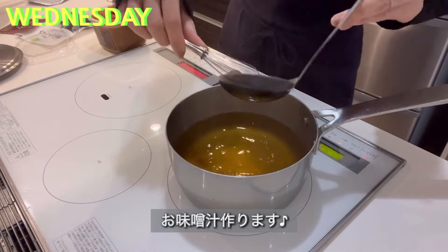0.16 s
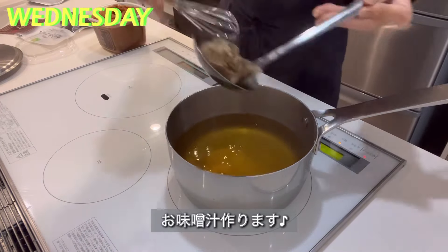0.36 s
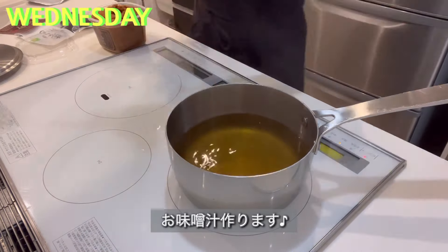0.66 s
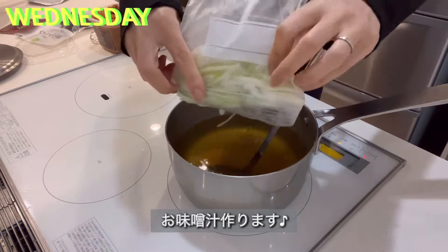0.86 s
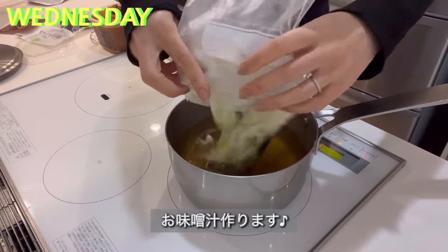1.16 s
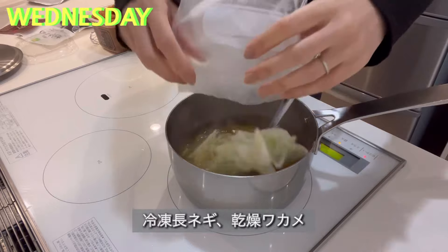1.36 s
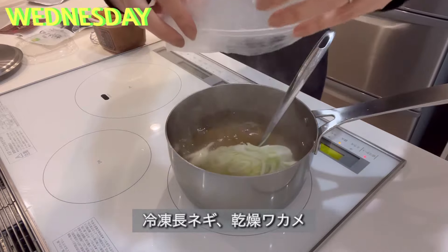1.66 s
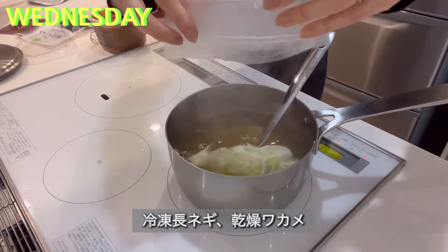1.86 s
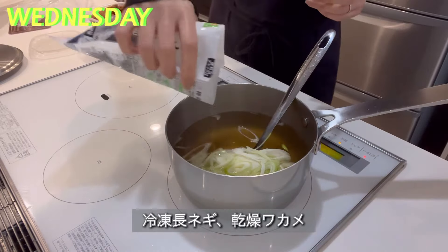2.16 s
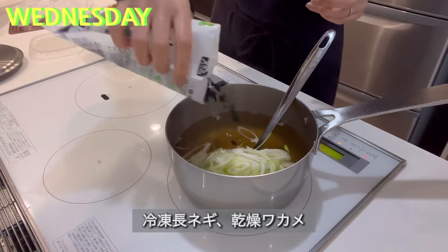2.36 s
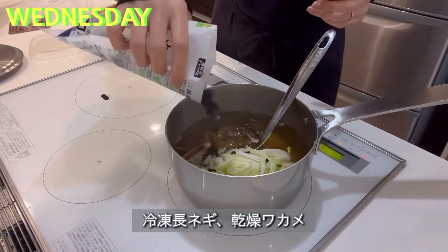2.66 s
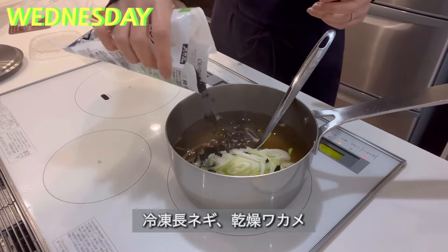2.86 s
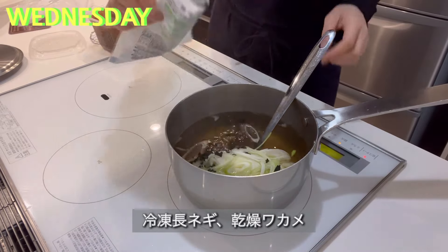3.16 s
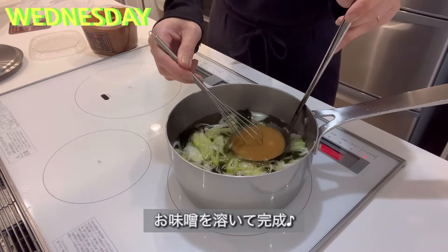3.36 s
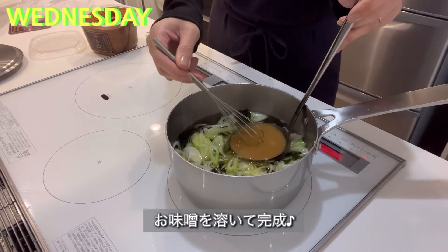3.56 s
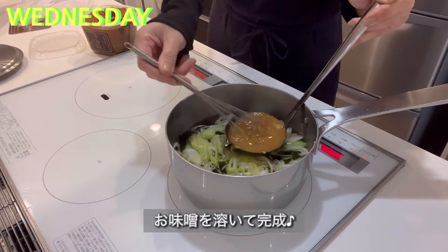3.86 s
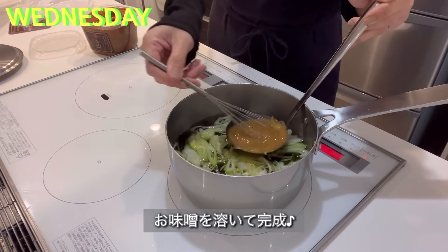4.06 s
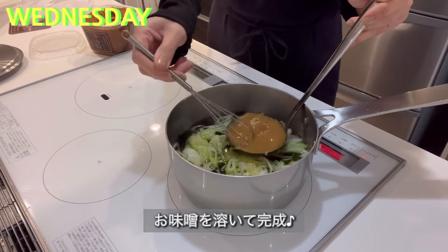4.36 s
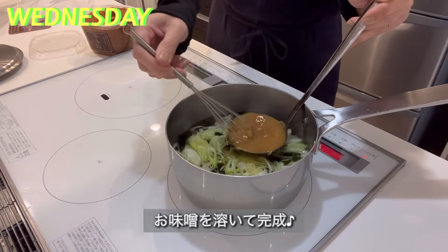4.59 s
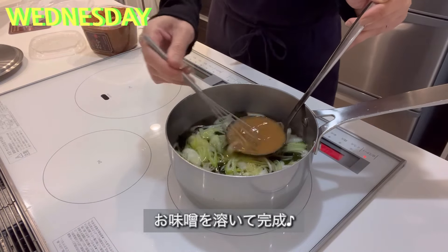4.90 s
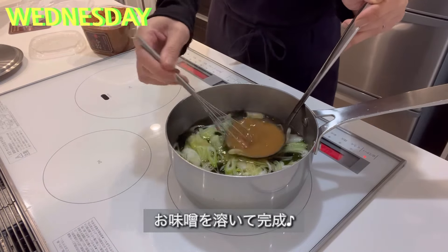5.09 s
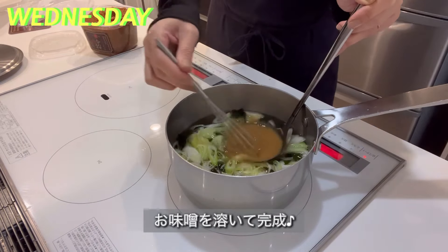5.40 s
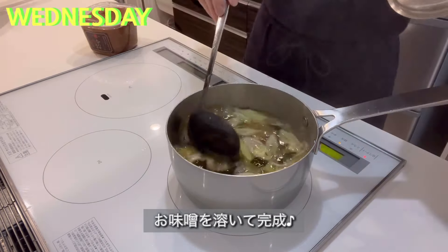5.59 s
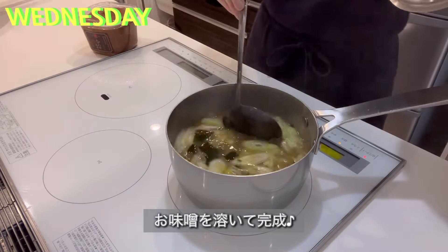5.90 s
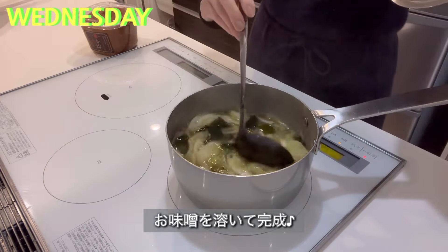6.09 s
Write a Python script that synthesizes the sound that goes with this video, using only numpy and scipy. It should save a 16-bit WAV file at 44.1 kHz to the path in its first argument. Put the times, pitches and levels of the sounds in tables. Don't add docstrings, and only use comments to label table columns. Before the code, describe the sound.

A small, hard-surfaced kitchen with a low, rushing hood fan throughout, picked up in stereo by a phone nearby. From 0.1 s whisk wires tick thinly on a steel ladle, scrape along it from 0.17 to 0.35 s, and tick once more. At 0.7 s the scene cuts to a freezer bag crackling loudly, with a strong squeeze at 1.0 s. At about 1.19 s a frozen block drops and the ladle clatters against the pot, several fast bright bounces with a low thud, the loudest moment, gone by 1.4 s. The film settles in tiny pops. From 1.9 s a stiff foil pack rustles and snaps, strongest near 2.26 and 2.43 s, calming by 2.9 s, with a brief rustle before 3.2 s. Then the fan is a little louder and broth simmers in a soft bubbling hiss, with small steel touches and drips around 4.6 to 5.3 s. After 5.47 s it drops to quieter fan and faint stirring ticks.

```python
import sys
import numpy as np
from scipy import signal
from scipy.fft import rfft, irfft
from scipy.io import wavfile
from scipy.ndimage import uniform_filter1d, map_coordinates

SR = 44100
rng = np.random.default_rng(int(sys.argv[2]) if len(sys.argv) > 2 else 0)


def wav_out(sig):
    wavfile.write(sys.argv[1], SR, np.round(np.clip(np.atleast_2d(sig).T, -1, 1) * 32767).astype(np.int16))


def gain_from_decibels(decibels):
    exponent = np.asarray(decibels, float) / 20
    return 10 ** exponent


N = 275184
TIME = np.arange(N) / SR


def level(x, db):
    return x * gain_from_decibels(db) / np.sqrt(np.mean(x ** 2))


def at_hz(table, hz, axis=1):
    points = np.array(table)
    return np.interp(np.log(hz + 1), np.log(points[:, 0]), points[:, axis])


def colour(x, table, size=4096):
    gain = gain_from_decibels(at_hz(table, np.arange(size // 2 + 1) * SR / size))
    cepstrum = irfft(np.log(gain))
    cepstrum[1:size // 2] *= 2
    cepstrum[size // 2 + 1:] = 0
    response = irfft(np.exp(rfft(cepstrum)))
    return signal.fftconvolve(x, response)[:len(x)]


def band(x, lo_hz, hi_hz, order=2):
    return signal.sosfilt(signal.butter(order, [lo_hz, hi_hz], "band", fs=SR, output="sos"), x)


def thirds(x):
    body = level(band(x, 280, 1600), 0)
    crackle = level(band(x, 1800, 6500), 0)
    treble = level(band(x, 7500, 18000), 0)
    return body, -crackle, treble


def walk(rate, size=N):
    hold = int(SR / rate)
    steps = np.repeat(rng.standard_normal(size // hold + 1), hold)
    return 1.02 * uniform_filter1d(uniform_filter1d(steps, hold), hold)[:size]


def ring(modes, size, spread_db, rattle=0.):
    hz, db, t60 = np.transpose(modes)[:, :, None]
    loudness, detune, sign = rng.standard_normal((3, len(modes), 1))
    t = TIME[:size]
    flutter = np.repeat(rng.standard_normal((len(modes), size // 200)), 200, axis=1)
    flutter = uniform_filter1d(flutter, size=200, axis=1)
    push = np.sign(sign) * (1 + rattle * flutter) / np.hypot(1, rattle)
    fade = np.exp(-np.log(1000) * t / np.minimum(t60, .5))
    tone = np.sin(2 * np.pi * hz * (1 + 0.00216 * detune) * t)
    return push * gain_from_decibels(db + spread_db * loudness) * fade * tone


def burst(t60, size=4000):
    return rng.standard_normal(size) * np.exp(-np.log(1000) * TIME[:size] / t60)


def add(out, s, sound):
    i = int(s * SR)
    out[..., i:i + sound.shape[-1]] += sound[..., :N - i]


def steady(table, flicker_db):
    out = 0
    spectrum = rfft([colour(noise, table) for noise in rng.standard_normal((2, N))])
    octave = np.log2(np.arange(N // 2 + 1) * SR / N + 1)
    for centre in range(4, 16, 2):
        window = np.cos(np.pi / 4 * np.clip(octave - centre, -2, 2)) ** 2
        out = out + gain_from_decibels(flicker_db * walk(9)) * irfft(spectrum * window, N)
    return level(out, 0)


# pitch_hz [Hz], level_db [dB per Hz]
FAN_AIR = [(25, -22), (92, 2), (150, -6), (250, -9), (300, -9.5), (440, -17.5), (550, -17.5), (700, -13),
           (800, -29.5), (1300, -32.5), (2300, -49), (5500, -52), (11000, -49), (15800, -57.5)]
# pitch_hz [Hz], width_hz [Hz], level_db [dB]
HOOD_DUCT = [(87.5, 13, 1.5), (118.1, 32, 3), (200, 20, -4), (425.5, 23, 3), (464.6, 22, -3.5),
             (650.6, 16, -10), (986, 60, -11), (1560, 72, -24)]


def fan():
    push = rng.standard_normal((2, N))
    duct = sum(level(band(push, hz - width / 2, hz + width / 2), db) for hz, width, db in HOOD_DUCT)
    return steady(FAN_AIR, flicker_db=1.54) + level(duct, -4.5)


# pitch_hz [Hz], level_db [dB per Hz]
BROTH = [(200, -9), (400, 1), (700, -12.5), (800, -11), (950, -12.5), (1250, -22), (1600, -18), (2100, -30),
         (3000, -31), (4500, -32), (5400, -26.5), (6500, -32), (8000, -26.5), (9500, -30.5), (11400, -31.5),
         (12500, -36), (15800, -49)]


def simmer():
    return steady(BROTH, flicker_db=1.44)


def narrow_bursts(table, t60):
    out = np.zeros(N)
    for s, db, hz in table:
        sound = band(burst(t60), hz / 1.2, hz * 1.2)
        add(out, s, gain_from_decibels(db - 3.0) * sound / np.abs(sound).max())
    return out


# start_s [s], peak_db [dB], pitch_hz [Hz]
BROTH_DRIPS = [(4.58, -51, 4500), (4.665, -45, 4500), (4.8711, -43, 11000), (4.8891, -33.5, 2230),
               (4.905, -49, 2400), (4.94, -48, 2300), (5.2987, -50, 4290), (5.6, -56, 4200),
               (5.6194, -52, 3100), (5.6194, -54, 11500), (5.645, -61, 3500), (5.66, -64.5, 11500),
               (5.69, -58, 2400), (5.71, -62, 10500), (5.8434, -65, 10990), (5.8863, -60.5, 10950),
               (5.955, -60, 11540), (6.0, -56, 11200), (6.0584, -59.5, 10500), (6.075, -62.5, 5020),
               (6.168, -60, 1400), (6.1931, -61, 10900), (6.2091, -59, 11200)]


def drips():
    return narrow_bursts(BROTH_DRIPS, t60=0.06)


# start_s [s], pitch_hz [Hz], level_db [dB], t60_s [s to fade by 60 dB]
DULL_KNOCKS = [(0.69, 90, -32.5, 0.13), (.892, 298, -33, .025), (1.012, 200, -34.5, 0.1),
               (1.035, 259, -36, 0.078), (1.064, 268, -33.5, 0.14), (1.098, 121, -36.5, .11),
               (1.124, 261, -38.5, .085), (1.128, 106, -37, 0.12), (1.14, 155, -33, 0.12),
               (1.7, 275, -44.5, 0.061), (1.198, 134, -18, 0.068), (1.212, 200, -24.5, 0.13),
               (1.224, 469, -24.5, 0.045), (1.245, 455, -25, 0.068), (1.317, 129, -34, .07),
               (1, 120, -35, 0.099), (1.391, 124, -36.5, 0.22), (1.451, 200, -41, .07),
               (2.093, 420, -33.5, 0.047), (2.096, 279, -35.5, .06), (2.258, 273, -32.5, 0.071),
               (2.43, 268.3, -38.5, 0.14), (2.7, 320, -49, 0.054), (5, 1590, -50.5, .043),
               (6.168, 1398, -68.5, 0.025)]


def knocks():
    out = np.zeros(N)
    for s, hz, db, t60 in DULL_KNOCKS:
        cluster = [(hz, db + 7.5, t60), (0.98 * hz, db, t60 / 2), (0.95 * hz, db, t60 / 2)]
        add(out, s, ring(cluster, size=8000, spread_db=1.0, rattle=0.36).sum(axis=0))
    return out


# start_s [s], pitch_hz [Hz], level_db [dB], t60_s [s to fade by 60 dB]
STEEL_PINGS = [(.1592, 9700, -43, 0.024), (.3662, 13100, -37, .025), (0.366, 11000, -41, .02),
               (0.3668, 9900, -37, .02), (1.1893, 7730, -19.5, .05), (1.2076, 11050, -13, 0.029),
               (1.209, 7800, -19, .04), (1.212, 6150, -21, .15), (1.214, 1018, -23.5, 0.15),
               (1.222, 9200, -27, 0.033), (1.224, 5750, -20, .08), (1.226, 5820, -25, .15),
               (1.232, 7780, -20, .04), (1.236, 4000, -22, .17), (1.239, 4540, -28, .17),
               (1.24, 4140, -34, .17), (1.4, 7780, -32, .04), (1.252, 11200, -32, .04),
               (4.6231, 3930, -46.5, 0.029), (4.6237, 12600, -46, .015), (4.6239, 10400, -51, .015),
               (4.794, 10000, -53, .02), (4.889, 1700, -41, 0.013), (4.8906, 2290, -50, .012),
               (5.0718, 8600, -35, 0.018), (5.073, 9500, -35, 0.017), (5.0722, 6300, -49, 0.016),
               (5.079, 11600, -47, .015), (5.6196, 4400, -51, 0.013), (5.62, 3300, -51, 0.0097),
               (5.6186, 2500, -50, .012)]


def pings():
    out = np.zeros(N)
    for s, hz, db, t60 in STEEL_PINGS:
        tones = [(hz, db, t60), (0.67 * hz, db - 4, t60 / 2)]
        add(out, s, ring(tones, size=6000, spread_db=-1.0, rattle=.2).sum(axis=0))
    return out


# pitch_hz [Hz], level_db [dB per Hz]
FILM_COLOUR = [(150, -7.5), (350, 2), (1000, 1), (2400, -3.5), (4500, -4), (6800, -5), (8000, -7.5),
               (9300, -4.5), (12500, -9), (13500, -12.5), (14100, -14), (15800, -25)]


def lone_cracks(table, t60):
    out = np.zeros(N)
    for s, db, treble_db, body_db in table:
        body, crackle, treble = thirds(colour(burst(t60), FILM_COLOUR))
        sound = crackle + gain_from_decibels(treble_db) * treble + gain_from_decibels(body_db) * body
        add(out, s, gain_from_decibels(db + 1.5) * sound / np.abs(crackle).max())
    return out


# start_s [s], peak_db [dB], treble_db [dB], body_db [dB]
STIR_TOUCHES = [(3.676, -54, 11, 16), (4.347, -60, -7, 12), (4.412, -66, -7, 19), (4.6229, -50.5, 14, -3),
                (4.7937, -48.5, 7, -10), (4.8896, -43, 3, 8), (5.024, -59, 19.5, 0),
                (5.0711, -55.5, 22.5, -7), (5.273, -48, 11, -5), (5.2984, -54.5, 11, -3),
                (5.5816, -65, 2, 0), (5.6194, -51.5, -7, -5), (6.0304, -72.5, 15, 0)]


def stirs():
    return lone_cracks(STIR_TOUCHES, t60=0.018)


# start_s [s], length_s [s], pitch_hz [Hz], level_db [dB]
SINGING_WIRES = [(.17, 0.084, 4240, -67), (.18, 0.088, 2900, -74), (.21, 0.046, 12050, -55),
                 (.22, .08, 14150, -53), (.229, .05, 6700, -57), (.231, 0.071, 5930, -57.5),
                 (0.234, 0.038, 10550, -51), (.25, 0.094, 7400, -54), (0.253, .09, 9650, -52),
                 (.26, .09, 4930, -70), (0.268, 0.058, 10300, -53), (0.286, .055, 8750, -55),
                 (.298, .04, 8700, -53), (.302, .04, 11400, -62), (0.369, 0.045, 12000, -61)]


def singing():
    out = np.zeros(N)
    for s, length, hz, db in SINGING_WIRES:
        size = int(length * SR)
        tone = level(band(rng.standard_normal(size), hz - 170, hz + 170), db)
        add(out, s, tone * np.hanning(size))
    return out


# [dB, share of the bowl's low ring]
WHISK_TICKS = [
    (0.1053, -40, 6),
    (.1155, -45, 5),
    (.159, -34.5, -11),
    (.2206, -51.5, -6),
    (.239, -44, -1),
    (.247, -50, -8),
    (.2794, -55, -8),
    (0.367, -38.5, 1.5),
]
# pitch_hz [Hz], level_db [dB], t60_s [s to fade by 60 dB]
WHISK_TONES = [(3566, -9, 0.08), (6450, -4, 0.05), (4100, -20, 0.073), (5890, -10, 0.072),
               (6840, -12, 0.075), (7400, -4.5, 0.071), (7840, -4, 0.076), (8500, -7, 0.11),
               (8900, -10, 0.085), (9900, -8, 0.059), (9900, -6.5, 0.059), (10400, -12, 0.061),
               (10500, -3.5, 0.049), (10800, -2, 0.064), (11220, -7, 0.041), (11770, -16, 0.089),
               (12100, -11, 0.05), (12900, -13, .1), (13160, -12, .1), (13900, -7, 0.1), (14260, -6, .1)]
# start_s [s], level_db [dB]
WHISK_SCRAPE = [
    (.17, -63),
    (.21, -51),
    (.24, -50.5),
    (.28, -52),
    (.31, -53),
    (.335, -56),
    (.347, -62),
    (.355, -75),
]


def whisk():
    out = np.zeros(N)
    bowl, wires = WHISK_TONES[:2], WHISK_TONES[2:]
    for s, db, bowl_db in WHISK_TICKS:
        add(out, s, gain_from_decibels(db - 6.0) * ring(wires, size=5000, spread_db=2.5, rattle=2.0).sum(axis=0))
        add(out, s, gain_from_decibels(db - 6.5 + bowl_db) * ring(bowl, size=5000, spread_db=3.5, rattle=0.33).sum(axis=0))
        click = gain_from_decibels(db - 3.0) * band(burst(0.023), 7100, 16000)
        add(out, s, click + gain_from_decibels(db - 16.0) * band(burst(0.1), 1800, 14500))

    s, db = np.transpose(WHISK_SCRAPE)
    dragging = (TIME > s[0]) * (TIME < s[-1])
    slips = rng.standard_normal(N) * gain_from_decibels(np.interp(TIME, s, db) + 2 * walk(60)) * dragging
    dragged = WHISK_TONES[1:]
    tones = ring(dragged, size=4000, spread_db=-3.0, rattle=1.8)
    tones = tones / np.linalg.norm(tones)
    half = SR // 2
    catch = gain_from_decibels(5.4 * np.array([walk(24.7, size=half) for _ in dragged]))
    add(out, 0, gain_from_decibels(-6.5) * signal.fftconvolve(slips[:half] * catch, tones, axes=1).sum(axis=0))

    out += gain_from_decibels(-5.5) * band(slips, 5300, 15000)
    out += gain_from_decibels(-7.0) * band(slips, 10200, 10900)
    return out + gain_from_decibels(-7.0) * band(slips, 1600, 5500)


# start_s [s], peak_db [dB], pitch_hz [Hz]
FILM_SNAPS = [(.7255, -22, 6040), (.8025, -30, 11000), (.812, -22, 3340), (.844, -27, 10500),
              (.882, -27, 10500), (.9636, -27, 1290), (.9847, -13.5, 10200), (.995, -9, 10200),
              (.9932, -15, 3690), (1.027, -12, 10500), (1.032, -27, 11000), (1.1653, -21, 5500),
              (1.4244, -26, 5240), (1.446, -50, 3640), (1.4634, -42, 2450), (1.4882, -36, 3650),
              (1.5192, -47, 2790), (1.54, -43, 2970), (1.547, -46, 4500), (1.6244, -53, 5900),
              (1.642, -59, 2250), (1.6523, -52, 2850), (1.6783, -52, 3990), (1.679, -56.5, 1290),
              (1.6967, -65, 3500), (1.7801, -57, 3600), (1.815, -56, 3500), (1.839, -57, 1400),
              (1.8544, -51, 3500), (1.865, -56, 3520), (2.0575, -24, 2600), (2.2421, -22, 2540),
              (2.263, -14, 3450), (2.4052, -31, 3130), (2.438, -25, 2980), (2.498, -42, 2820),
              (2.808, -33, 11300), (2.825, -44, 10800), (2.85, -45, 11100), (3.0707, -30.5, 2680)]


def snaps():
    return narrow_bursts(FILM_SNAPS, t60=0.031)


# start_s [s], peak_db [dB], treble_db [dB], body_db [dB]
FILM_CREASES = [(0.7248, -26.5, -7, -15), (0.7707, -20.5, 2, -2.5), (0.7906, -28.5, 14.5, -3),
                (0.8026, -22.5, -13.5, 1.5), (0.8624, -26.5, 5, -20), (0.8913, -17, 9.5, 5.5),
                (0.9526, -31, 16, -21), (0.9574, -23, 4.5, -10), (1.3576, -38, 8.5, -25),
                (1.4227, -34.5, 17.5, 6), (1.4561, -35.5, -12, 7.5), (1.6533, -53, -18, 6),
                (1.6786, -56, -14.5, -1), (1.8538, -51.5, -5, -14.5), (2.0943, -31.5, -21, 11),
                (2.2588, -17.5, -28.5, -11), (2.2676, -25.5, -15, -5), (2.4293, -21.5, -24, 0.5),
                (2.4277, -26.5, -17, -23), (2.5691, -31, 13, -22), (2.8, -47.5, 16, -12),
                (2.8614, -47, 9.5, -13), (2.9156, -53.5, 12.5, 1), (3.07, -46, -19, -22)]


def creases():
    return lone_cracks(FILM_CREASES, t60=0.021)


# start_s [s], level_db [dB]
BAG_GRIP = [
    (0.707, -38.5),
    (0.8, -43),
    (0.93, -41.5),
    (1.117, -40.5),
    (1.186, -36.5),
    (1.27, -40),
    (1.344, -46.5),
    (1.48, -53),
    (1.6, -67),
    (1.9, -73.5),
]
# start_s [s], level_db [dB]
FOIL_GRIP = [
    (1.907, -31),
    (2.149, -36.5),
    (2.21, -35.5),
    (2.4, -38),
    (2.72, -38),
    (2.939, -70.5),
    (3.065, -48),
    (3.15, -45.5),
    (3.207, -31),
]
# peak_s [s], level_db [dB], length_s [s]
HAND_SQUEEZES = [(0.859, -36.5, 0.051), (0.955, -38.5, 0.023), (1.004, -20.5, 0.091), (1.162, -32, 0.021),
                 (1.437, -43, 0.03), (1.865, -62.5, 0.035), (2.077, -45.5, 0.0183), (2.261, -31.5, 0.026),
                 (2.341, -35.5, 0.057), (2.431, -27.5, 0.044), (2.508, -33.5, 0.048), (2.605, -38, 0.041),
                 (3.128, -47, .07), (3.206, -47, 0.01)]


def bags():
    sizes = gain_from_decibels(2.0 * np.minimum(rng.exponential(size=N), 4))
    tiny_creases = (rng.random(N) < .15) * rng.standard_normal(N) * sizes
    body, crackle, treble = thirds(colour(tiny_creases * gain_from_decibels(2.5 * walk(39.8)), FILM_COLOUR))

    def film(treble_db, body_db):
        return gain_from_decibels(-5.0) * (crackle + gain_from_decibels(treble_db) * treble + gain_from_decibels(body_db) * body)

    out = np.zeros(N)
    for grip, rustle in ((BAG_GRIP, film(-1.5, -1.8)), (FOIL_GRIP, film(-2, -6.5))):
        s, db = np.transpose(grip)
        in_hand = (TIME >= s[0]) * (TIME < s[-1])
        out += in_hand * gain_from_decibels(np.interp(TIME, s, db)) * rustle

    rise_db, fall_db = 44.5, 25
    swell = np.zeros(N)
    for s, db, length in HAND_SQUEEZES:
        swell += gain_from_decibels(db - np.maximum(rise_db * (s - TIME), fall_db * (TIME - s)) / length)
    rasp = band(crackle, 2400, 3520) * (TIME > FOIL_GRIP[0][0])
    return out + swell * (film(-3, -5.5) + rasp)


# start_s [s], ring_db [dB], crack_db [dB], thud_db [dB]
BOUNCES = [(1.189, -23.5, -20.5, -38.5), (1.193, -26.5, -24.5, -41), (1.198, -37, -41.5, -22.5),
           (1.2075, -13, -15.5, -23.5), (1.213, -20.5, -19.5, -31.5), (1.221, -19.5, -25.5, -20),
           (1.226, -27, -23, -29), (1.233, -24, -24.5, -26.5), (1.241, -33, -28, -34.5),
           (1.2464, -31, -29, -32), (1.251, -25.5, -33, -35), (1.265, -38, -37, -28.5),
           (1.29, -34.5, -38, -37.5)]
# pitch_hz [Hz], level_db [dB], t60_s [s to fade by 60 dB]
POT_TONES = [(975, -5.5, 0.08), (998, -5, .11), (1555, -6.5, 0.098), (2660, -6, 0.15), (3300, -9.5, 0.1),
             (3700, -12.5, .08), (3940, -7, 0.11), (4170, -8, 0.1), (4450, -2.5, 0.13), (5440, -5, .07),
             (6300, -6.5, 0.064), (2300, -8.5, 0.12), (1130, -12, .06), (5387, -3, 0.08), (5650, -2, .09),
             (5825, -0.5, 0.12), (6040, -5, .07), (6270, -1, .12), (7830, 5.5, .045), (1385, -8, 0.092),
             (1830, -9, 0.071), (2440, -11.5, 0.08), (2840, -11, .1), (3450, -14, 0.061), (4860, -10, .06),
             (7350, -9.5, .05), (9200, -7, .04), (7900, -2, 0.064), (7940, -4.5, 0.073), (8500, -3, 0.038),
             (10760, -6.5, 0.07), (10630, -9.5, 0.0467), (11200, -6.5, 0.06), (11620, -11, 0.05)]
# pitch_hz [Hz], level_db [dB], t60_s [s to fade by 60 dB]
HOB_TONES = [(90, -9.5, .1), (121, -1, 0.13), (170, -3.5, 0.088), (200, 1, 0.18), (280, -12, 0.046),
             (343, -18, 0.046), (420, -0.5, 0.035), (473, 1.5, 0.11), (564, -5, 0.059), (635, 3.5, 0.087),
             (683, -7.5, 0.055)]
# pitch_hz [Hz], level_db [dB per Hz]
CRACK_COLOUR = [(150, -12.5), (400, 1), (1200, -2.5), (2000, -14.5), (3000, -6), (6000, -0.5), (7000, -3),
                (11000, -2.5), (15800, -23.5)]


def clatter():
    out = np.zeros(N)
    for s, ring_db, crack_db, thud_db in BOUNCES:
        add(out, s, gain_from_decibels(ring_db - 5.5) * ring(POT_TONES, size=8000, spread_db=0.8, rattle=0.78).sum(axis=0))
        add(out, s, gain_from_decibels(crack_db + 8.0) * colour(burst(0.029), CRACK_COLOUR))
        thud = ring(HOB_TONES, size=7000, spread_db=2.0, rattle=0.34).sum(axis=0)
        add(out, s, gain_from_decibels(thud_db - 2.5) * band(thud, 60, 1200))
    return out


def room():
    low_t60_s, treble_t60_s, echo_db = .34, 0.19, -5.5
    t = TIME[:SR // 2]
    low = band(rng.standard_normal((2, len(t))), 30, 2500)
    high = band(rng.standard_normal((2, len(t))), 2500, 19000)
    tails = low * gain_from_decibels(-60 * t / low_t60_s) + high * gain_from_decibels(-60 * t / treble_t60_s)
    tails *= np.clip(t / 0.0047, 0, 1) * gain_from_decibels(echo_db) / np.linalg.norm(tails, axis=1, keepdims=True)
    tails[0, 0] += 1
    tails[1, 9] += 1
    return tails / np.linalg.norm(tails, axis=1, keepdims=True)


# pitch_hz [Hz], side_db [dB, side minus mid], alike [-1 to 1, likeness of side to mid in phase],
# alike_quarter [-1 to 1, likeness a quarter cycle apart]
MICROPHONES = [(73.9, -17.5, -0.95, 0), (250, -11, -0.78, 0), (430, -7.5, -0.42, .25), (727, 6, -0.43, .25),
               (1400, -6, 0.05, -.1), (2087, 0.5, 0.075, -.2), (3300, -2.5, -0.4, 0.049),
               (5330, 2, -0.46, 0), (6600, 3, -0.3, .1), (7400, 6.5, -0.25, 0), (8900, 6, -0.23, -0.25),
               (9500, 3, 0, -.65), (10370, -4.5, 0, -.6), (11100, -19, 0.018, -.2), (11900, -27, 0, 0),
               (12800, -6.5, 0, .3), (14600, 14.5, 0.05, .2)]


def pair(front, echoes):
    hz = np.arange(N // 2 + 1) * SR / N
    ratio = gain_from_decibels(at_hz(MICROPHONES, hz))
    alike = at_hz(MICROPHONES, hz, axis=2) + 1j * at_hz(MICROPHONES, hz, axis=3)
    mid = rfft(front) / np.sqrt(1 + ratio ** 2)
    unlike = np.sqrt(np.clip(1 - abs(alike) ** 2, 0, 1) / (1 + ratio ** 2))
    side = ratio * (alike * mid + unlike * rfft(echoes))
    return irfft(np.array([mid + side, mid - side]), N)


# start_s [s], fan_db [dB], simmer_db [dB]
KITCHEN_SHOTS = [
    (0, -46, -60.5),
    (0.706, -45, -61),
    (1.906, -45, -63.5),
    (3.208, -41, -44),
    (5.47, -46.5, -73.5),
]


def scene():
    near = drips() + knocks() + pings() + stirs() + singing() + whisk()
    near += snaps() + creases() + bags() + clatter()
    hood, broth, walls = fan(), simmer(), room()
    sway = 8.5 * walk(25)
    near = np.array([near, map_coordinates(near, [np.arange(N) + sway], mode="mirror")])
    close, far = np.zeros((2, 2, N))
    cuts = [int(row[0] * SR) for row in KITCHEN_SHOTS] + [N]
    for (_, fan_db, simmer_db), i, j in zip(KITCHEN_SHOTS, cuts, cuts[1:]):
        close[:, i:j] = signal.fftconvolve(near[:, i:j], walls, axes=1)[:, :j - i]
        far[:, i:j] = gain_from_decibels(fan_db) * hood[:, i:j] + gain_from_decibels(simmer_db) * broth[:, i:j]
    return pair(*(close + far))


def roll_off(x):
    return signal.sosfilt(signal.butter(12, 15810, fs=SR, output="sos"), x)


def record(dry):
    mix = np.tanh(0.69 * dry) / 0.71
    return roll_off(mix)


dry = scene()
out = record(dry)
wav_out(out)
```